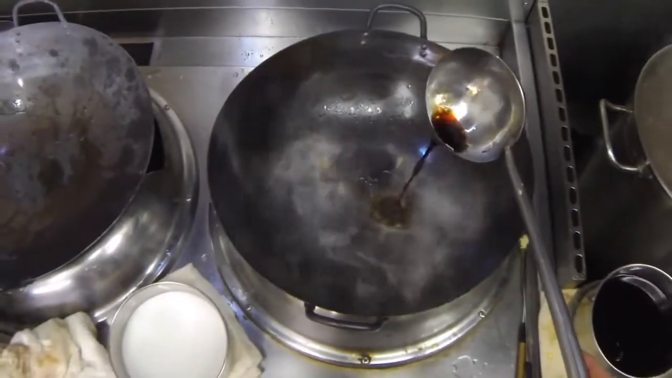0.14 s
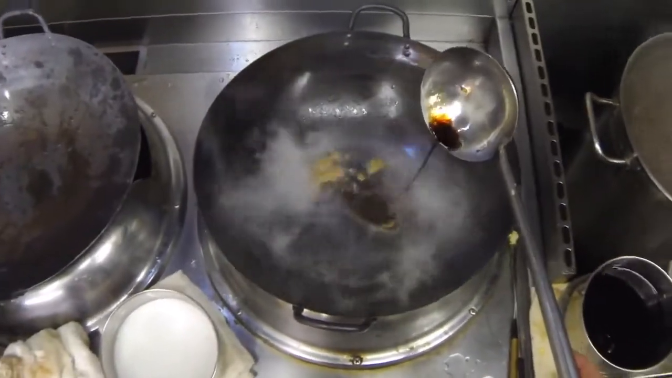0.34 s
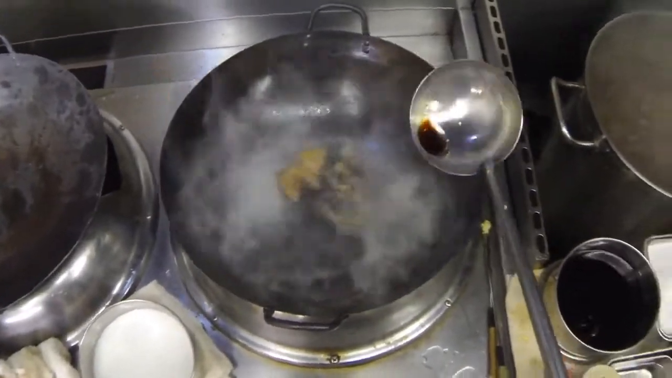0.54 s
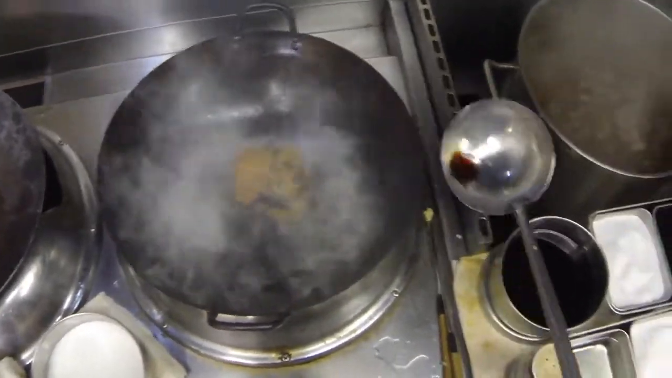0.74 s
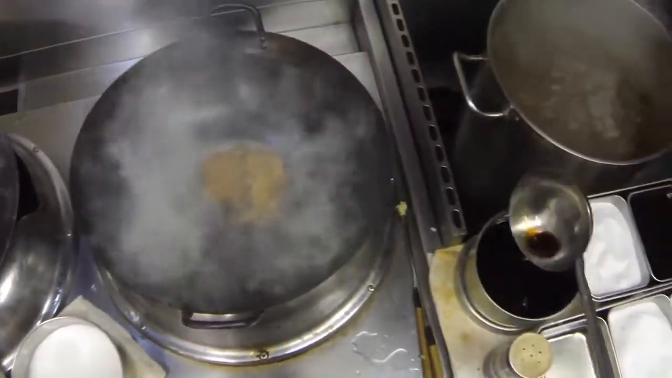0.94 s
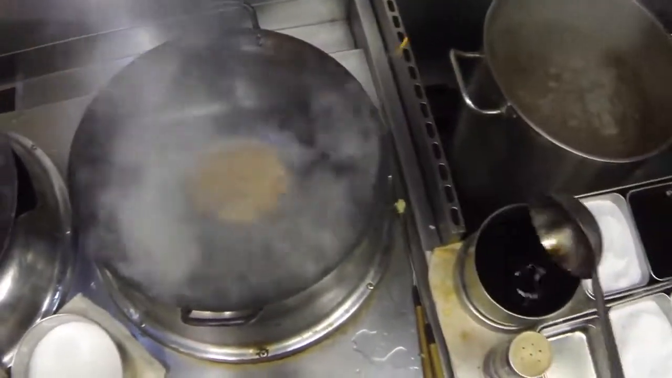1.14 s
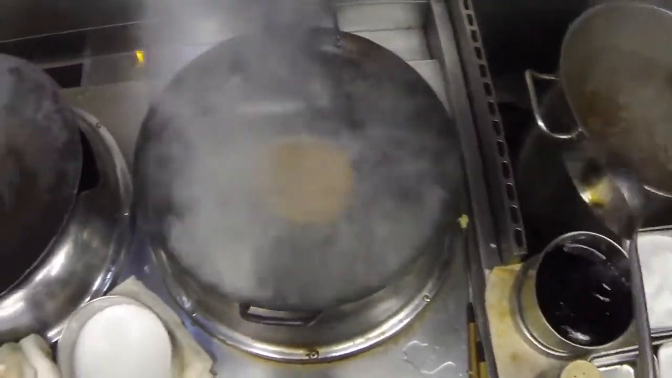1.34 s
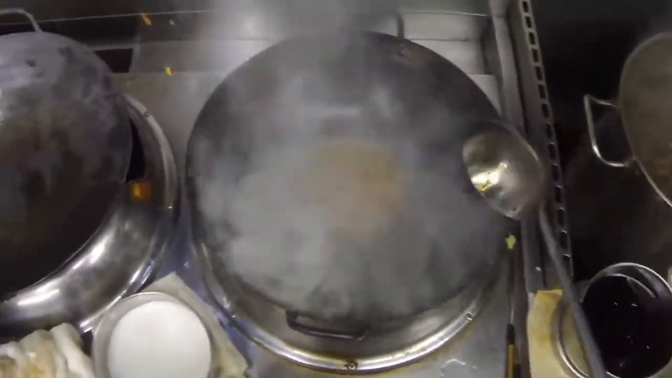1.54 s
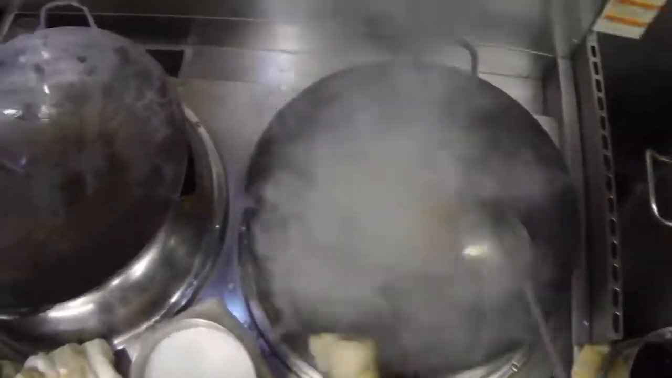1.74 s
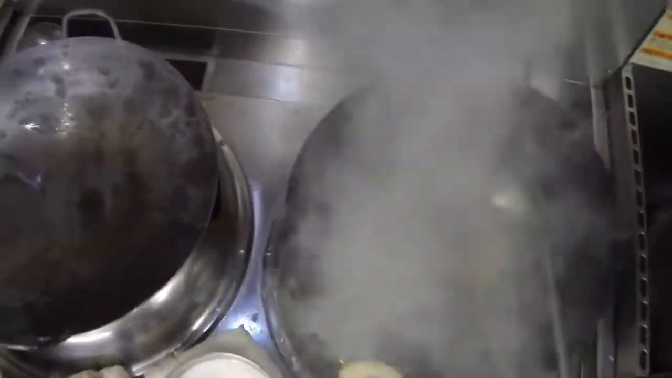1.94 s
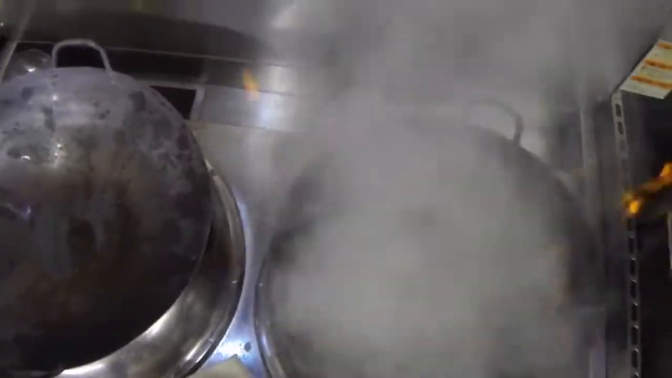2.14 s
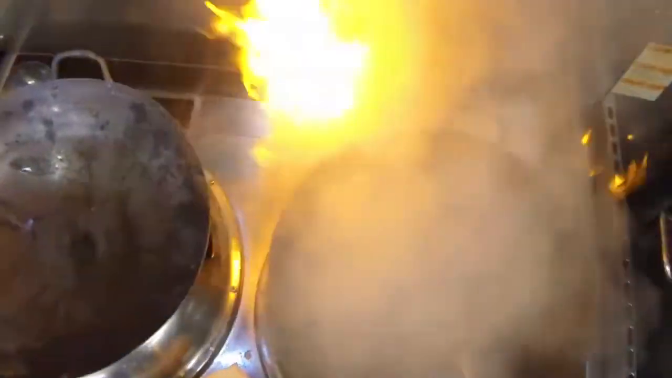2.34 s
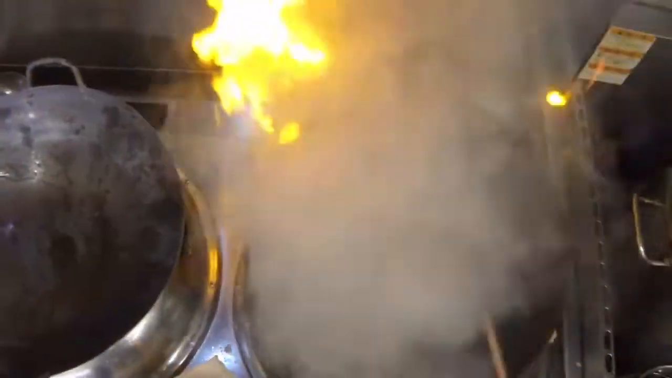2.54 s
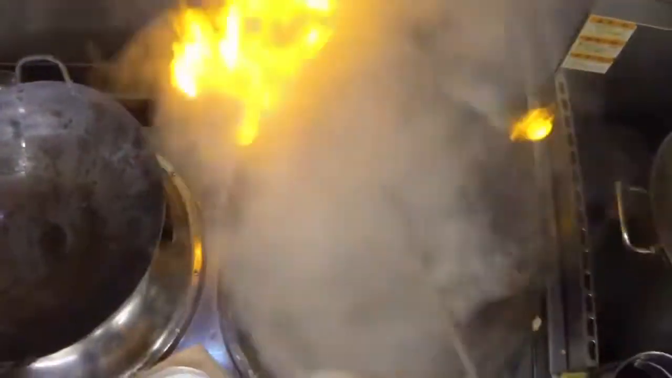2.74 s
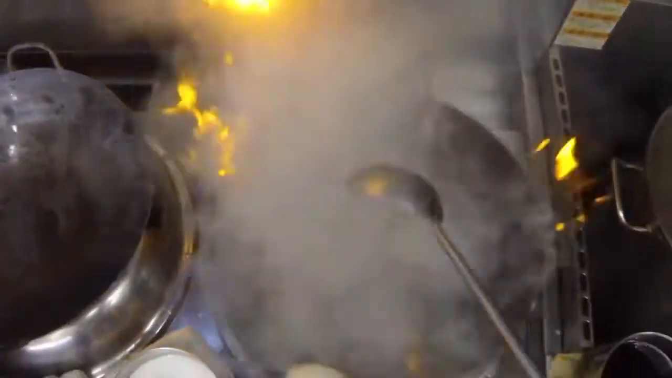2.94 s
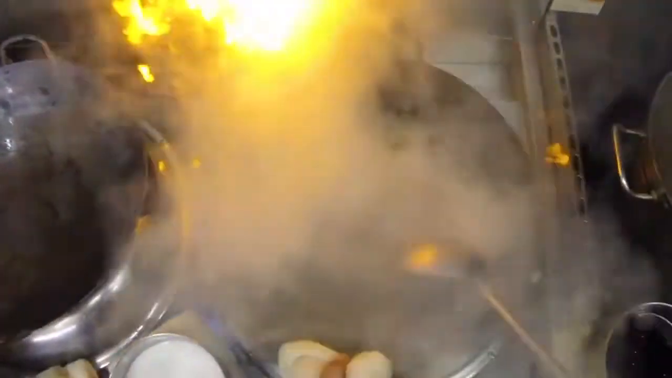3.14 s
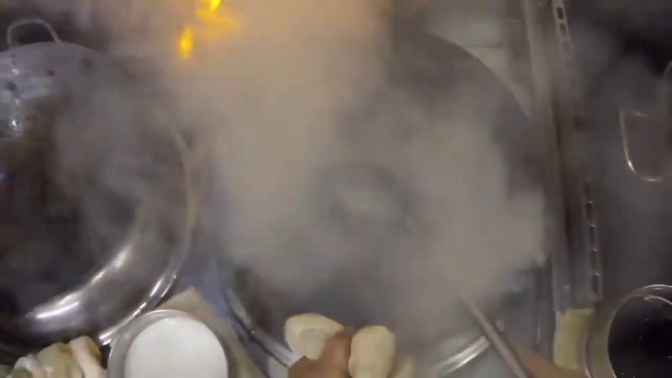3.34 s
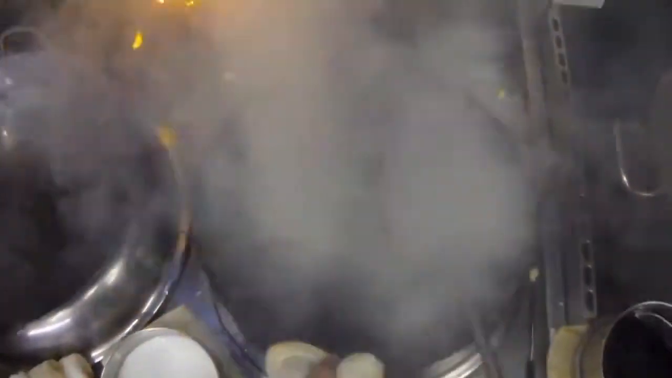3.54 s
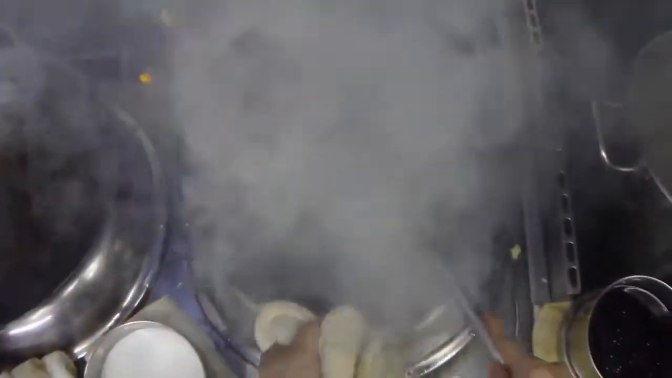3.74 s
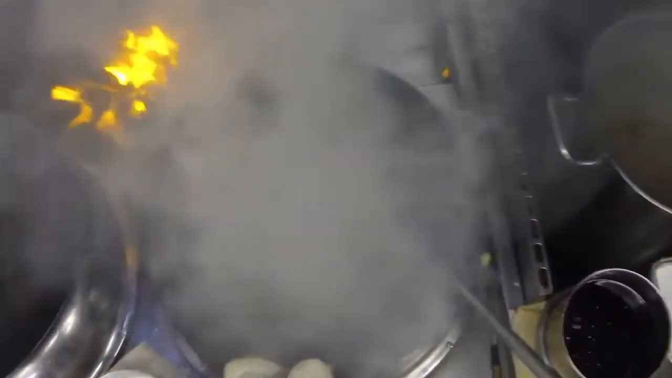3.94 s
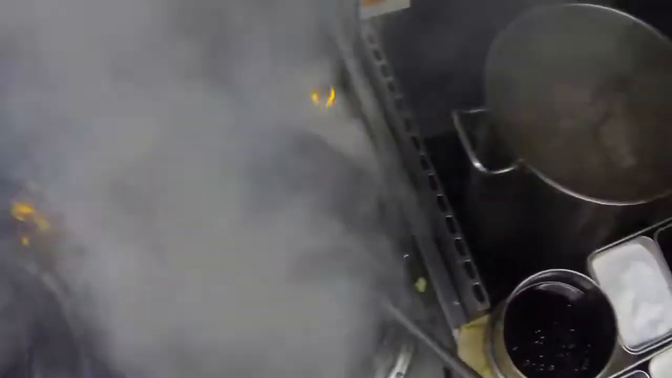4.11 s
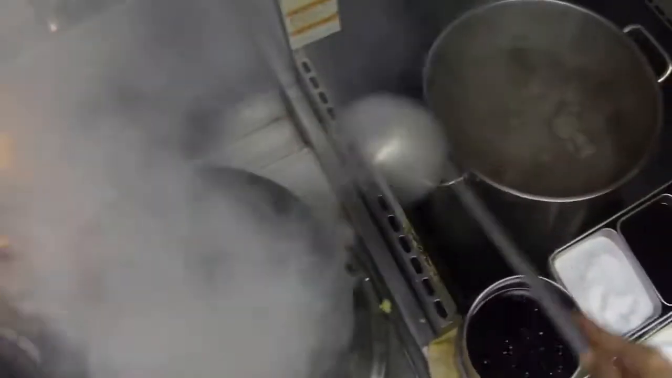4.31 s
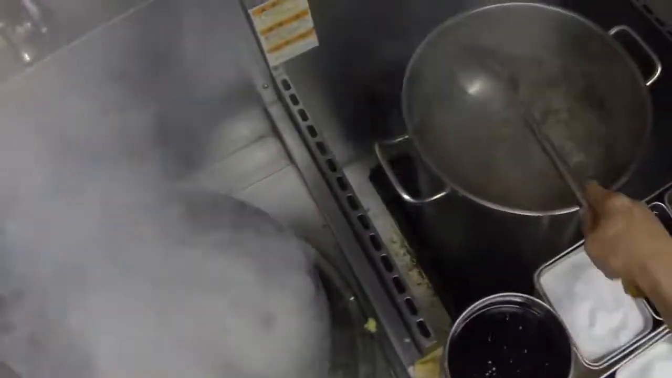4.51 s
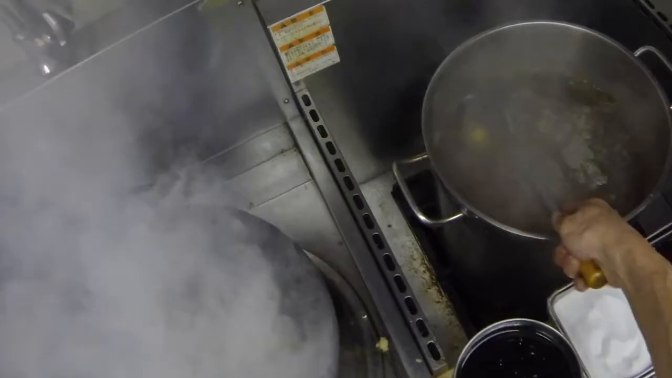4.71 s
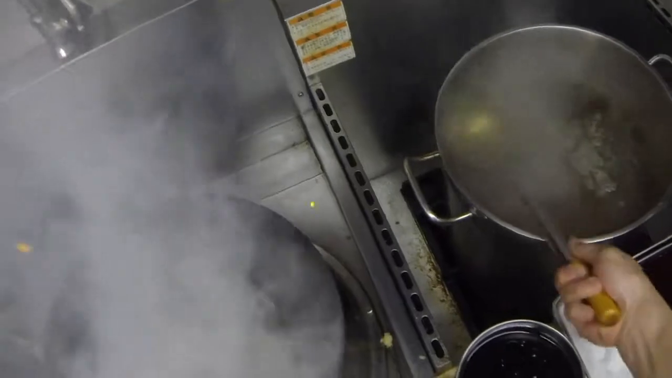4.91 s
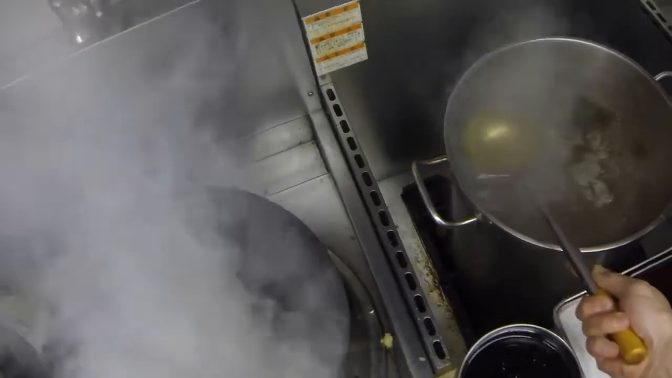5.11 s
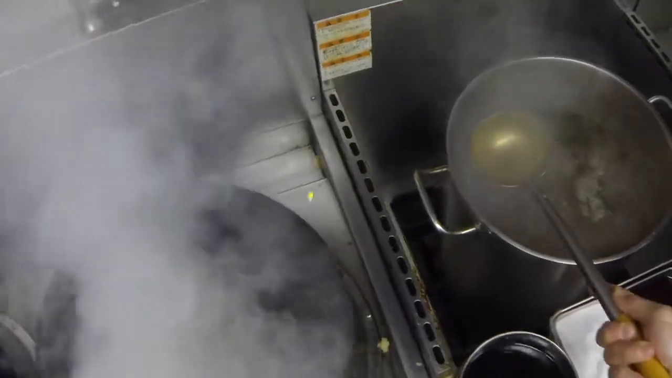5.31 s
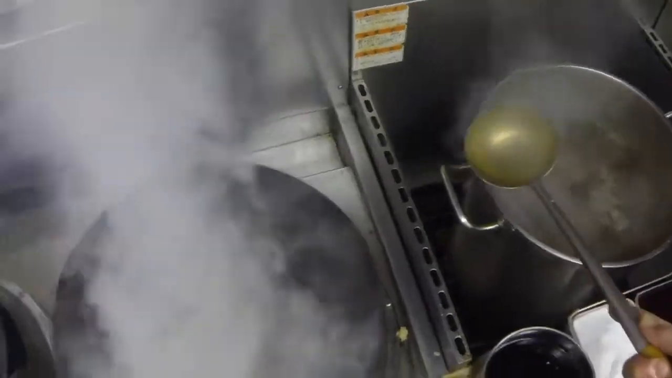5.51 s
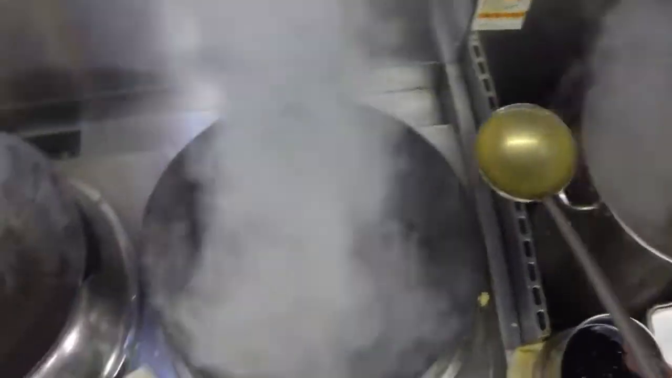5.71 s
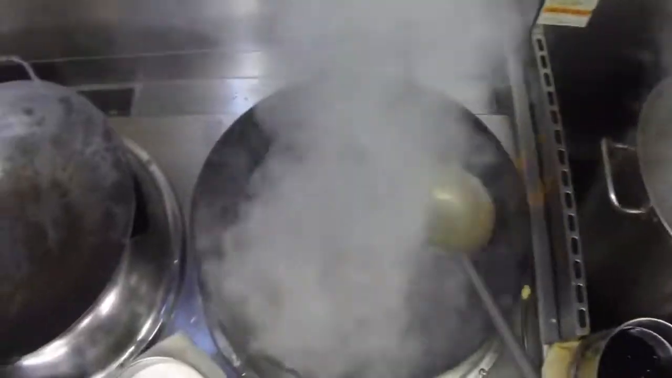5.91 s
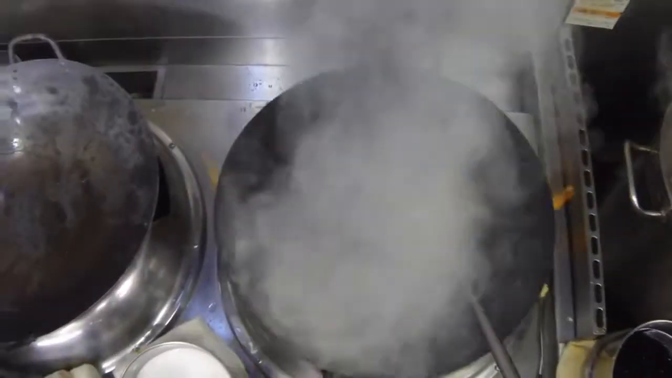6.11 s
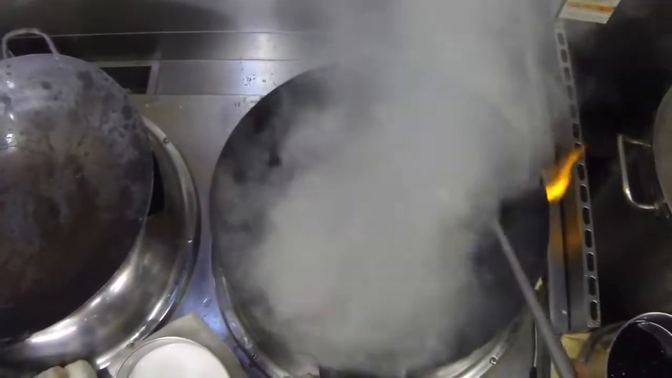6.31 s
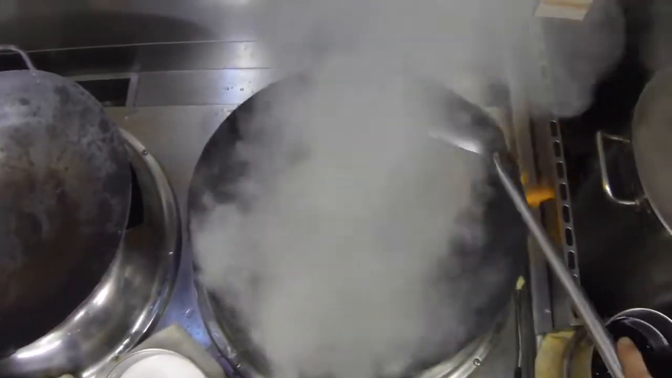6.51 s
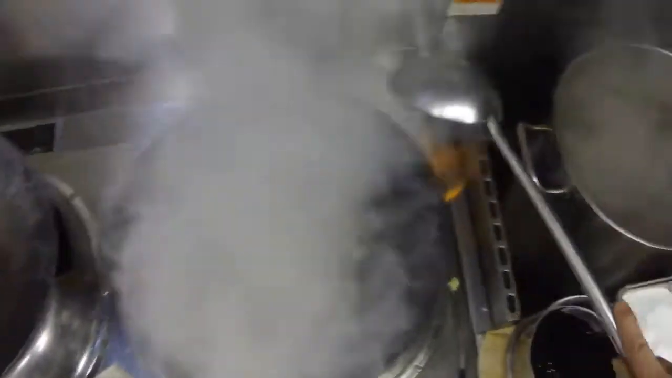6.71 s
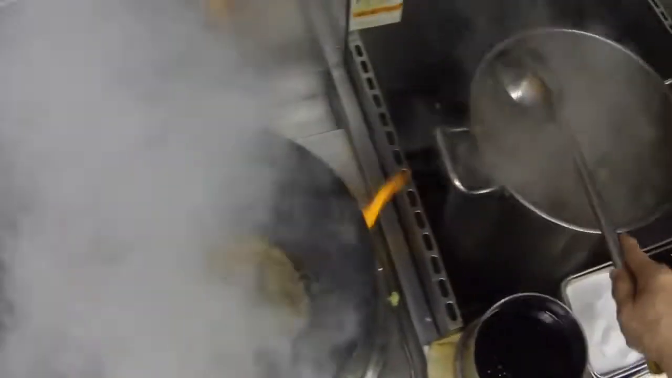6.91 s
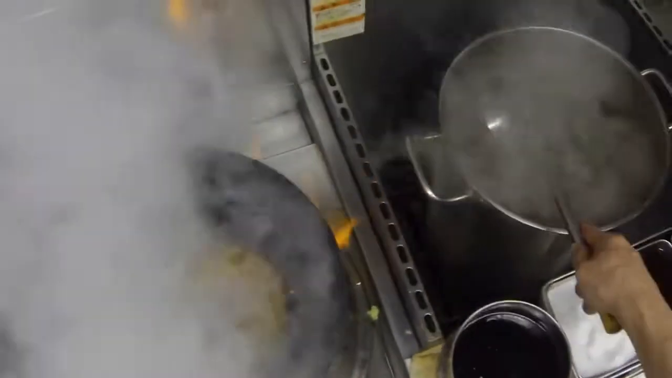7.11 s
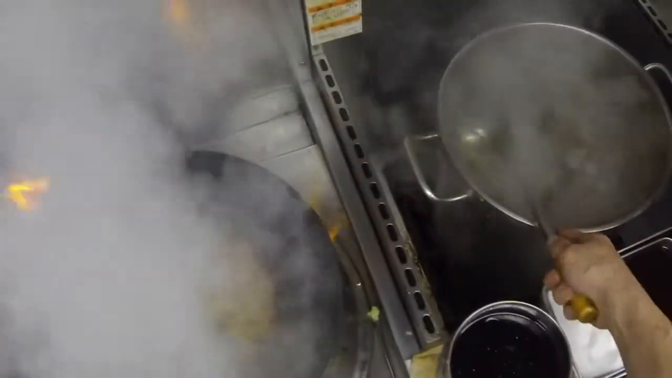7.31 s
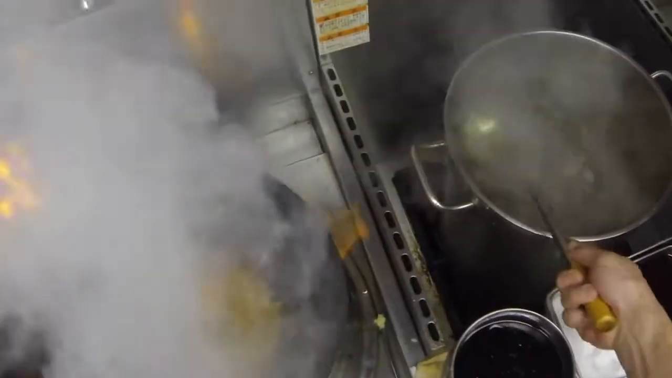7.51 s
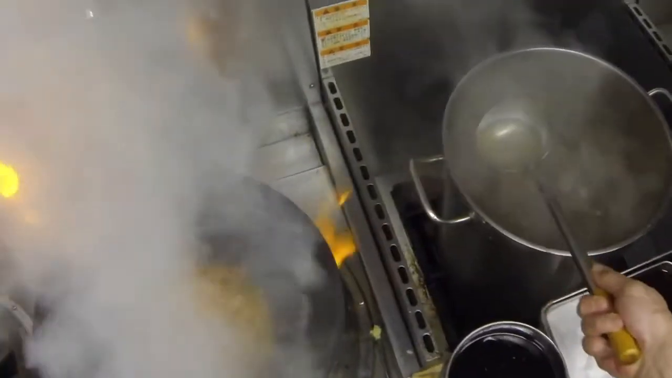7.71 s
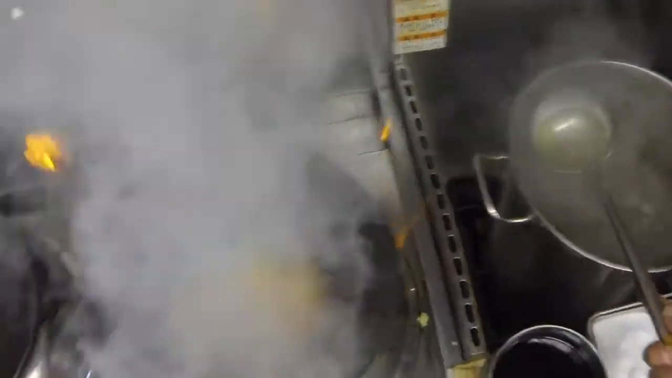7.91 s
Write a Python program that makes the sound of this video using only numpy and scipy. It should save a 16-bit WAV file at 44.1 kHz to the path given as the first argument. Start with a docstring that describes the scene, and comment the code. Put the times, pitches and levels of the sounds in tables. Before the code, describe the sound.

Heard close from above in slight stereo: steam hiss and dense fizz over a low gas roar. After nearly two seconds, hurried ladle blows ring the steel wok, with bright clangs, rattling scrapes and dull low thuds, while flames flap in deep gusts. The loud blows briefly push the background down. Afterwards a hard spluttering boil remains, one lone clank, then gurgling bubbles that slowly ease.

```python
"""Stock flashes to steam on a very hot steel wok, heard from close above.
The tail of an earlier ladle clang dies away, then fizz and a hard boil.
From about 1.8 s a steel ladle knocks and drags on the wok, often in double blows, with one late blow at 6.1 s.
Meanwhile the flames of the gas burner below flutter most strongly over its low roar, then calm down.
Bubbles and flames are crowds of short ringing grains; blows are decaying tones set off by a tick and a rattle.
The recorder's gain sinks after loud sound and creeps back up."""
import sys
import numpy as np
from scipy import signal
from scipy.io import wavfile
from scipy.ndimage import uniform_filter1d

SR = 44100
rng = np.random.default_rng(int(sys.argv[2]) if len(sys.argv) > 2 else 0)


def invert_db(x):
    """Field ratio 10**(x/20) for x, a level in decibels (scalar or array-like)."""
    u = np.asarray(x, float) / 20
    return 10 ** u


def unload_audio(sound):
    """Save the sound as a 16-bit wav file, at the path given as the first command line argument."""
    columns = np.transpose(np.atleast_2d(sound))
    # keep every value between -1 and 1, then stretch to whole-number steps
    steps = np.round(np.clip(columns, -1, 1) * 32767)
    wavfile.write(sys.argv[1], SR, steps.astype(np.int16))


N = 350595  # length in samples

# The ladle's blows on the wok; levels are relative, each centre is the pitch the struck spot favours:
# start_s [s], ring_db [dB], clang_db [dB], crack_db [dB], ring_centre_hz [Hz], clang_centre_hz [Hz]
LADLE_BLOWS = [(1.818, -21, -30, -30, 300, 3620), (1.992, -16, -23, -34, 1820, 4180),
               (2.063, -10.5, -19, -22, 1220, 3870), (2.127, -11.5, -28, -11.5, 760, 4420),
               (2.21, -21, -34, -17, 646, 3570), (2.267, -20, -29, -29, 1450, 3340),
               (2.324, -5.5, -10, -30, 1160, 3570), (2.441, -15, -36, -31, 780, 3810),
               (2.535, -16.5, -24, -27, 920, 3820), (2.593, -4.5, -9, -25, 1140, 3520),
               (2.685, -8.5, -16.5, -18, 587, 3720), (2.718, -13.5, -29, -22, 790, 4280),
               (2.811, -10.5, -13, -12, 1470, 3460), (2.863, -1.5, -4, -14, 980, 3350),
               (2.992, -3, -9, -25, 503, 4360), (3.043, 1, -8, -7, 735, 3850),
               (3.163, -6.5, -8, -11, 1700, 4930), (3.217, 2, -1.5, -1.5, 815, 4000),
               (3.24, -5, -10, -15, 895, 3870), (3.329, -15, -18, -17, 910, 3760),
               (3.56, -22, -33, -24, 347, 3870), (3.647, -13, -18, -11, 684, 3340),
               (3.739, -5, -10.5, -15, 1640, 3900), (3.794, 2.5, -2, -14, 1320, 3730),
               (3.897, -3, -8, -21, 606, 4180), (3.952, 7.5, -3.5, -7, 570, 4100),
               (4.015, 0.5, 0.5, -5, 1700, 4800), (4.069, 0.5, -2.5, 4, 580, 3730),
               (4.183, -1.5, -1.5, -8, 620, 4700), (4.24, 3, -3, 0.5, 627, 3730),
               (4.286, -5, -12.5, -29, 620, 4320), (6.121, -9.5, -17.5, -28, 534, 3910)]
# The tones of the wok: pitch_hz [Hz], level_db [relative dB], t60_s [s to fall 60 dB, before extra damping]
WOK_MODES = [(189, -9.5, 0.57), (251.5, 1.5, 0.51), (321, -13, 0.18), (399.4, -1.5, 0.32), (426.3, 1, 0.79),
             (486, -5, 0.91), (565.4, -1.5, .3), (608.4, -1.5, 0.76), (672, 3.5, 0.22), (741, -1, 0.32),
             (798, -5, 0.85), (895, 4.5, 0.29), (964, 0, 0.46), (1061, -17, 0.28), (1076, -0.5, 0.3),
             (1195, 8, 0.19), (1220, 7, 0.14), (1273, -1, 0.23), (1367, -4.5, 0.33), (1466, -0.5, 0.62),
             (1524, 4.5, 0.17), (1620, 2, 0.16), (1700, 1.5, 0.29), (1801, 6, 0.13), (2290, 4, 0.23),
             (2497, 7.5, 0.14)]


def rms_one(x):
    """Scale to an rms (average strength) of one."""
    return x / np.sqrt(np.mean(x ** 2) + 1e-20)


def in_time(rows):
    """Read each column of a time table at every sample."""
    s, *columns = np.transpose(rows)
    return [np.interp(np.arange(N) / SR, s, c) for c in columns]


def at_hz(points, hz):
    """Read a pitch table on a log-frequency axis."""
    table_hz, table_db = np.array(points).T
    return np.interp(np.log(hz), np.log(table_hz), table_db)


def drift(rate_hz):
    """Slow random wandering of rms one, one value per 40 samples."""
    r = np.exp(-80 * np.pi * rate_hz / SR)
    noise = rng.standard_normal(N // 40 + 2002)
    slow = signal.lfilter([1], [1, -2 * r, r * r], noise)
    return rms_one(slow[2000:])  # skip the filter's start-up


def spread(mid, side, hz):
    """Make left and right at pitch hz from a shared part and a part of opposite sign in the two ears."""
    # Stereo width: pitch_hz [Hz], opposed minus shared part [dB]
    width = [(60, -46), (130, -22), (290, -29), (640, -15), (1410, -11.5), (3100, -4), (6820, -3),
             (15000, -1.5)]
    # Stereo balance: pitch_hz [Hz], left minus right [dB]
    balance = [(60, 0), (250, -.4), (1000, -1.2), (2000, -1.8), (8000, -1.1), (15000, -.5)]
    opposed = invert_db(at_hz(width, hz))
    lean = invert_db(at_hz(balance, hz) * np.array([[.5], [-.5]]))
    both = mid + opposed * side * np.array([[1], [-1]])
    return lean * both / np.sqrt(1 + opposed ** 2)


def grains(colour, pitches, per_s, cycles, uneven_db, patchy_db):
    """Random bursts each ring at one of several pitches, falling 60 dB in the given cycles; rms one."""
    low_hz, high_hz = colour[1][0], min(colour[-1][0], colour[-2][0] * 1.015)
    together, out, each = drift(7), 0, int(per_s * N / SR / pitches)
    for hz in np.geomspace(low_hz, high_hz, pitches):
        at = rng.integers(0, N, (2, each))
        height_db = uneven_db * np.minimum(rng.exponential(1, (2, each)), 5)
        heights = invert_db(height_db) * rng.choice([-1, 1], (2, each))
        # patches: partly common to all pitches, partly this pitch's own
        patch = invert_db(at_hz(colour, hz) + patchy_db * (.8 * together + drift(12)))
        bursts = np.full((2, N), 1e-18)
        np.put_along_axis(bursts, at, heights * patch[at // 40], axis=1)
        r, w = invert_db(-60 * hz / (cycles * SR)), 2 * np.pi * hz / SR
        # factor hz: the level per Hz follows the colour
        resonator = [hz * np.sin(w)], [1, -2 * r * np.cos(w), r * r]
        out = out + signal.lfilter(*resonator, spread(*bursts, hz))
    high_pass = signal.butter(4, 0.85 * low_hz, "high", fs=SR, output="sos")
    return rms_one(signal.sosfilt(high_pass, out))


def after_blows(level_db, decay_s):
    """An envelope that jumps at each blow and dies away."""
    burst = np.full(N, 1e-18)
    start_s = np.array(LADLE_BLOWS)[:, 0]
    burst[np.round(start_s * SR).astype(int)] = invert_db(level_db)
    return signal.lfilter([1], [1, -np.exp(-1 / (decay_s * SR))], burst)


def burner():
    """A gas burner: low-pitched grains make a roar and a still lower flutter of flames round the rim."""
    # Flame strength: start_s [s], flutter_db [dB, before random gusts]
    flames = [(0, -56), (1.3, -48.5), (1.8, -40), (1.94, -29), (2.3, -35), (2.6, -28.5), (3.2, -25),
              (3.5, -28), (3.72, -22), (4.25, -25), (4.7, -26), (5.65, -37), (6.2, -46), (7.0, -45),
              (7.95, -52)]
    # Colour of the roar: pitch_hz [Hz], level_db [relative dB per Hz]
    roar_colour = [(29, -31), (50, 1.5), (96, 0), (160, 3), (210, -32), (350, -120)]
    # Colour of the flutter: pitch_hz [Hz], level_db [relative dB per Hz]
    flutter_colour = [(12, -30), (20, 6.5), (34, -11), (50, -15), (65, -39), (110, -120)]
    roar = grains(roar_colour, pitches=5, per_s=600, cycles=3.0, uneven_db=0.5, patchy_db=1.3)
    flutter = grains(flutter_colour, pitches=4, per_s=400, cycles=3.8, uneven_db=2.0, patchy_db=2.7)
    flame_db, = in_time(flames)
    gusts_db = 2.5 * np.repeat(drift(4.0), 40)[:N]
    # the roar follows a share of the flutter's swing
    roar_db = -46.5 + 0.46 * (flame_db - flame_db.mean())
    return invert_db(roar_db) * roar + invert_db(flame_db + gusts_db) * flutter


def crack():
    """Bright dying noise of steel on steel."""
    high_pass = signal.butter(2, 4600, "high", fs=SR, output="sos")
    noise = signal.sosfilt(high_pass, rng.standard_normal((2, N)))
    crack_db = np.array(LADLE_BLOWS)[:, 3]
    return after_blows(crack_db, decay_s=0.027) * spread(*noise, 10000)


def touches(per_s=1500):
    """A quarter second of uneven little contacts, rms one."""
    when, size = rng.random(SR // 4), rng.standard_normal(SR // 4)
    return rms_one((when < per_s / SR) * size)


def struck(modes, blow_db, delay_s, rattle_s, rattle_db, damping, detune, uneven_db):
    """A tick and a dying rattle excite each mode as a close pair, damped and shifted by the liquid."""
    hz, level_db, t60_s = np.repeat(modes, 2, axis=0).T[:, :, None]
    t, out = np.arange(SR // 4) / SR, np.zeros((2, N + SR))
    fade = invert_db(-60 * t / (t60_s * damping))
    for (start_s, *_), strength_db in zip(LADLE_BLOWS, np.repeat(blow_db, 2, axis=1)):
        shift, *luck = rng.standard_normal((3, len(hz), 1))
        mode_db = strength_db[:, None] + level_db
        # chance shares out the blow's energy, its total is set by the strength
        total = np.linalg.norm(invert_db(mode_db))
        parts = [invert_db(mode_db + uneven_db * u).T * rng.choice([-1, 1], len(hz)) for u in luck]
        mid, side = [total * part / np.linalg.norm(part) for part in parts]
        tones = fade * np.sin(2 * np.pi * hz * (1 + detune * shift) * t)
        rings = spread(mid, side, hz.T) @ tones
        force = invert_db(rattle_db) * np.exp(-t / rattle_s) * touches()
        force[0] = 1  # the tick
        sound = signal.fftconvolve(rings, force[None], axes=1)
        at = round((start_s + delay_s) * SR)
        out[:, at:at + sound.shape[1]] += sound
    return out[:, :N]


def near(modes, level_db, centre_hz, fall_db):
    """Strength per blow and mode, falling per octave away from the centre that the struck spot favours."""
    octaves = abs(np.log2(np.array(modes)[:, 0] / centre_hz[:, None]))
    return level_db[:, None] - fall_db * octaves


def blows():
    """The wok rings at once, its lowest modes build up under a longer drag, the ladle clangs just after."""
    # The tones of the ladle: pitch_hz [Hz], level_db [relative dB], t60_s [s to fall 60 dB, before damping]
    ladle_modes = [(2750, 7.5, 0.16), (3060, -10, 0.067), (3350, 14.5, 0.085), (3520, 6, 0.18),
                   (3420, -27, 0.11), (3605, 4, 0.24), (3730, 8.5, 0.25), (3760, 2, 0.17), (3845, 1, 0.64),
                   (4000, -9.5, 0.16), (3930, 5.5, 0.24), (4100, 3, 0.33), (4180, -1, 0.37),
                   (4420, -3, 0.52), (4340, 4, 0.18), (4700, 6, 0.17), (4480, 3, 0.75), (4770, 5, 0.12),
                   (4630, 1, 0.25), (4740, 0.5, 0.69), (4850, -6, 0.77), (5040, 2, 0.12), (5170, 2, 0.12),
                   (5400, 0, 0.3)]
    _, ring_db, clang_db, _, ring_hz, clang_hz = np.transpose(LADLE_BLOWS)
    low, high = WOK_MODES[:3], WOK_MODES[3:]
    drag_s = 0.028  # the ladle rattles on after each blow
    # the low thud grows by only a share of the ring's dB
    thud_db = near(low, 0.55 * ring_db - 15, ring_hz, fall_db=5.0)
    thud = struck(low, thud_db, delay_s=0.0018, rattle_s=1.6 * drag_s, rattle_db=-22.5,
                  damping=0.45, detune=0.0083, uneven_db=1.0)
    high_db = near(high, ring_db - 16.0, ring_hz, fall_db=9.5)
    ring = struck(high, high_db, delay_s=0, rattle_s=drag_s, rattle_db=-24.5,
                  damping=0.41, detune=0.0244, uneven_db=2.0)
    ladle_db = near(ladle_modes, clang_db - 15, clang_hz, fall_db=22.5)
    clang = struck(ladle_modes, ladle_db, delay_s=0.00102, rattle_s=1.3 * drag_s, rattle_db=-19.5,
                   damping=0.27, detune=0.0125, uneven_db=2.0)
    # a shell this size radiates little below its lowest mode
    high_pass = signal.butter(4, 165, "high", fs=SR, output="sos")
    return signal.sosfilt(high_pass, thud + ring + clang)


def singing(noise, damping):
    """The boil shakes the wok, whose modes stand out of the noise as faint lines."""
    out = 0
    for hz, _, t60_s in WOK_MODES[1:-2]:
        r, w = invert_db(-60 / (t60_s * damping * SR)), 2 * np.pi * hz / SR
        resonator = [(1 - r * r) / 2, 0, (r * r - 1) / 2], [1, -2 * r * np.cos(w), r * r]
        out = out + signal.lfilter(*resonator, noise)
    return out


def liquid():
    """Smallest, quickest bubbles hiss; larger ones fizz, splutter and gurgle, and shake the wok into a hum."""
    # The boil, the last three above the steam hiss; the loud start of fizz_db is the tail of a ladle clang:
    # start_s [s], steam_db [dB], fizz_db [dB], splutter_db [dB], bubbles_db [dB]
    boil = [(0, -27.5, 13.5, -4, -24), (.12, -23, -3, -13, -22), (.35, -21.5, -3.5, -12.5, -19),
            (.7, -20, -1, -14.5, -18.5), (1.45, -19, -1.5, -14.5, -17.5), (1.9, -16.5, -6, -15.5, -20),
            (2.31, -14, -7, -15, -16), (2.39, -19.5, -6.5, -13, -14.5), (2.85, -15.5, -4, -18, -19),
            (3.35, -17, -4, -11, -16), (3.76, -12.5, -2.5, -7.5, -17.5), (3.9, -12.5, -6, -7, -15),
            (4.45, -16, -3, -5, -16), (5.7, -17, -1.5, -4, -14.5), (6.08, -17.5, -4, -6.5, -13),
            (6.2, -15.5, -3.5, -4.5, -17.5), (6.4, -16, -7.5, -8, -11.5), (6.75, -19.5, -2, -3, -4.5),
            (6.84, -20, -5.5, -11.5, -9.5), (7.15, -21, -5.5, -4, -7.5), (7.4, -20.5, -4.5, -9, -9.5),
            (7.95, -19.5, -6.5, -10, -11.5)]
    # Colours of the five kinds of grain, each: pitch_hz [Hz], level_db [relative dB per Hz]
    hiss_colour = [(3060, -32), (5200, -16), (6020, -14), (7040, -1), (9670, 0), (14400, -0.5),
                   (15600, -17)]
    fizz_colour = [(1410, -39), (2400, -10), (2630, -7), (2850, -2.5), (3110, -9.5), (3400, -0.5),
                   (3700, -1.5), (4200, -2.5), (4750, -6), (5100, -12), (5400, -16), (7020, -60)]
    splutter_colour = [(760, -39), (1300, -7), (1430, -9), (1540, 0.5), (1870, 1.5), (2020, -5.5),
                       (2390, -2), (2660, -4.5), (2800, -1.5), (3100, -6), (4030, -12), (6820, -120)]
    bubbles_colour = [(260, -44), (450, -25), (549, -2.5), (724, -3.5), (1150, -1), (1260, -2), (1400, 3.5),
                      (1820, -26), (3080, -120)]
    hum_colour = [(94, -36), (160, -0.5), (193, -2), (264, 5), (356, -17.5), (389, 5.5), (480, -5),
                  (620, -31), (1060, -120)]
    steam_db, fizz_db, splutter_db, bubbles_db = in_time(boil)
    hiss = grains(hiss_colour, pitches=10, per_s=30000, cycles=10.6, uneven_db=0.5, patchy_db=0.5)
    fizz = grains(fizz_colour, pitches=14, per_s=10000, cycles=27.0, uneven_db=0.0, patchy_db=0.6)
    splutter = grains(splutter_colour, pitches=16, per_s=5000, cycles=47.0, uneven_db=0.0, patchy_db=1.07)
    bubbles = grains(bubbles_colour, pitches=12, per_s=1500, cycles=27.4, uneven_db=-0.5, patchy_db=-0.4)
    hum = grains(hum_colour, pitches=8, per_s=800, cycles=18.7, uneven_db=1.0, patchy_db=1.2)
    body = invert_db(fizz_db) * fizz + invert_db(splutter_db) * splutter + invert_db(bubbles_db) * bubbles
    # the hum follows a share of the big bubbles' swing
    body = body + invert_db(-19 + 0.54 * bubbles_db) * hum
    # each blow shakes the wok, so hum and bubbles swell briefly, at a level tied to the wok's ring
    shake = after_blows(np.array(LADLE_BLOWS)[:, 1], decay_s=0.075)
    body = invert_db(steam_db) * body + shake * (invert_db(-24.5) * bubbles + invert_db(-21.5) * hum)
    lines = singing(body.mean(axis=0), damping=0.92)
    return invert_db(steam_db) * hiss + body + invert_db(-5.0) * lines


def gain_control(x):
    """Gain drops by the excess of the level over the threshold and creeps back at a steady rate."""
    threshold_db, attack_s, release_db_per_s, sense_s = -14.5, 0.019, 6, 0.026
    power = uniform_filter1d(np.mean(x ** 2, axis=0), int(sense_s * SR))
    level_db = 10 * np.log10(power + 1e-12)
    creep_db = release_db_per_s * np.arange(N) / SR
    over_db = np.maximum(level_db - threshold_db, 0)
    # hold the highest excess so far, less the steady creep back
    excess_db = np.maximum.accumulate(over_db + creep_db) - creep_db
    r = np.exp(-1 / (attack_s * SR))
    return x * invert_db(-signal.lfilter([1 - r], [1, -r], excess_db))


def scene():
    """Burner, blows and boiling liquid together."""
    return burner() + crack() + blows() + liquid()


def top_cut(x):
    """Nothing passes above the cut-off."""
    return signal.sosfilt(signal.butter(12, 16910, fs=SR, output="sos"), x)


def record(dry):
    """Gain control, then the loudest peaks are rounded and the top is cut."""
    rounded = 1.418 * np.tanh(gain_control(dry) / 1.18)
    low_pass = signal.ellip(10, .5, 70, 15950, fs=SR, output="sos")  # cut-off in Hz
    mix = signal.sosfilt(low_pass, rounded)
    return top_cut(mix)


dry = scene()
out = record(dry)
unload_audio(out)
```